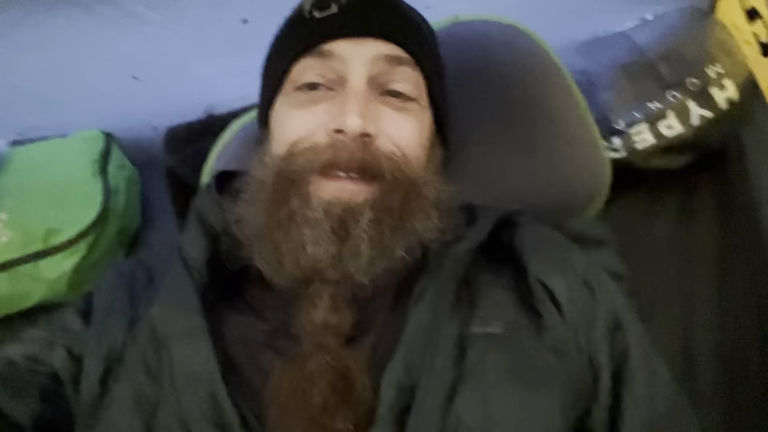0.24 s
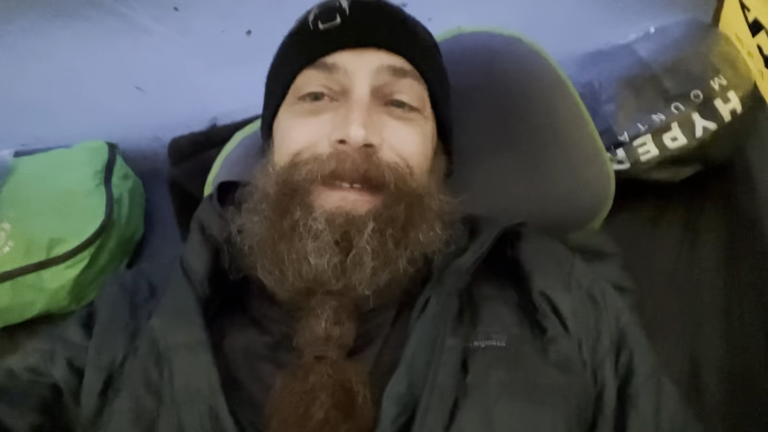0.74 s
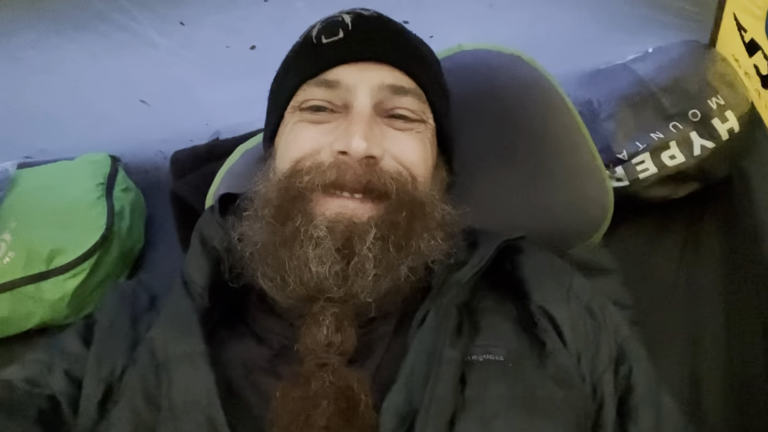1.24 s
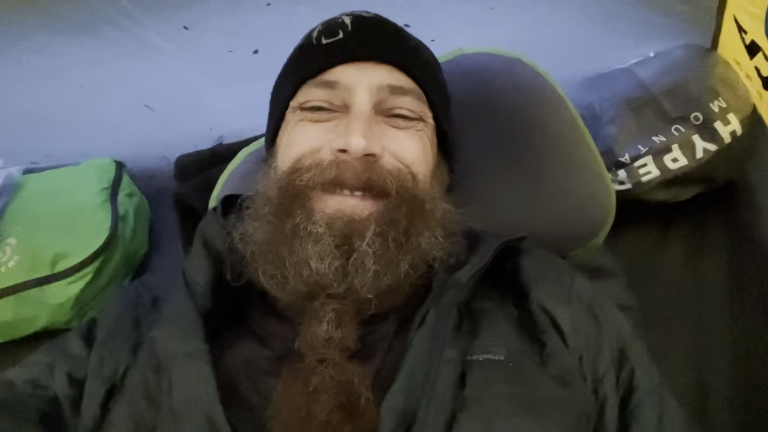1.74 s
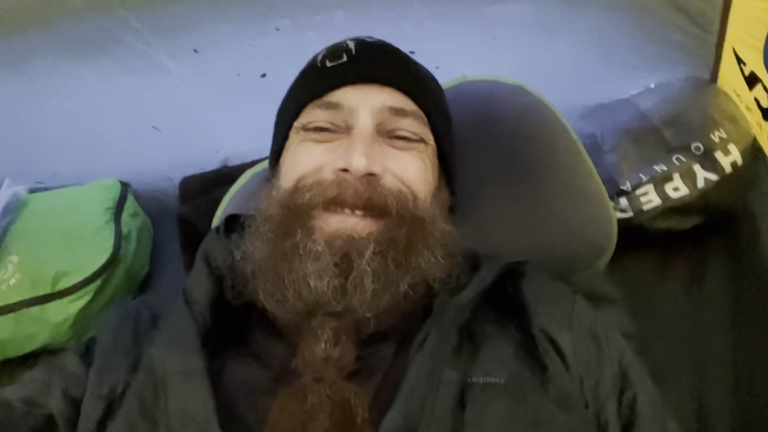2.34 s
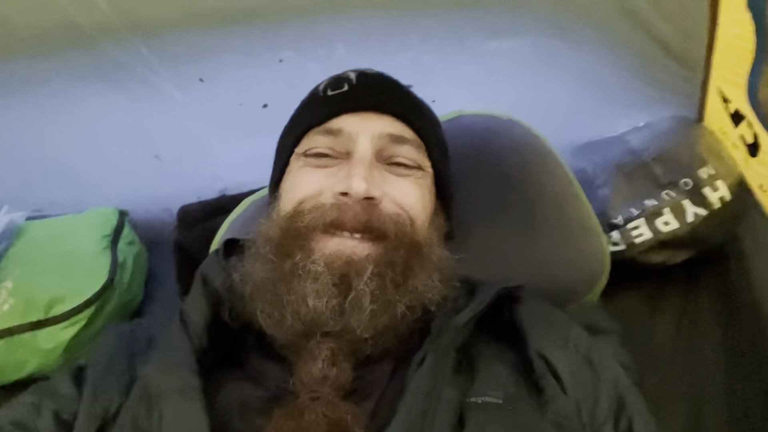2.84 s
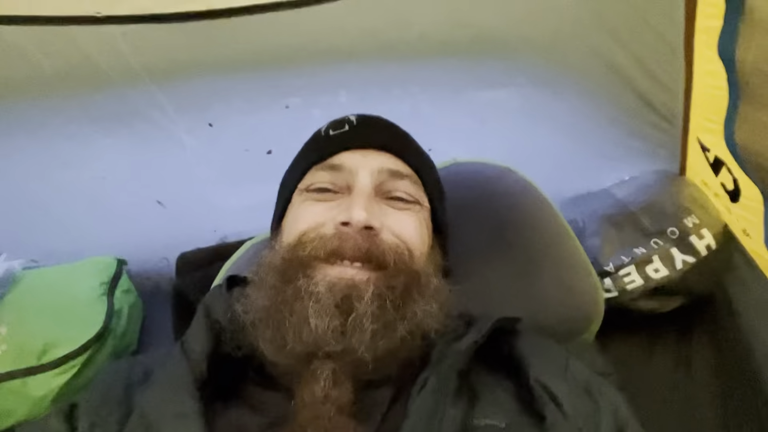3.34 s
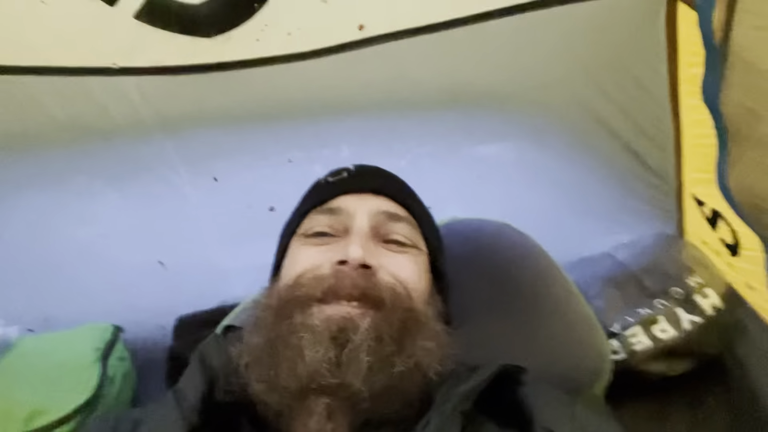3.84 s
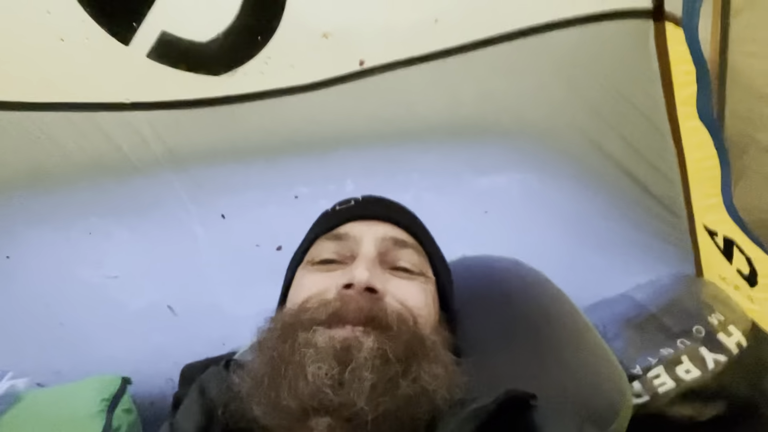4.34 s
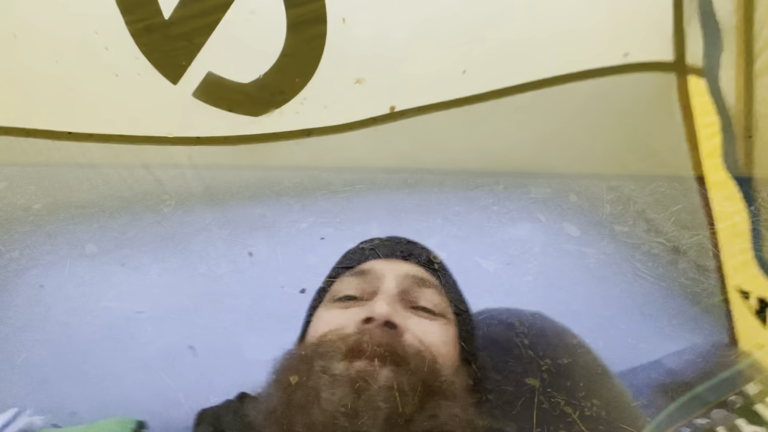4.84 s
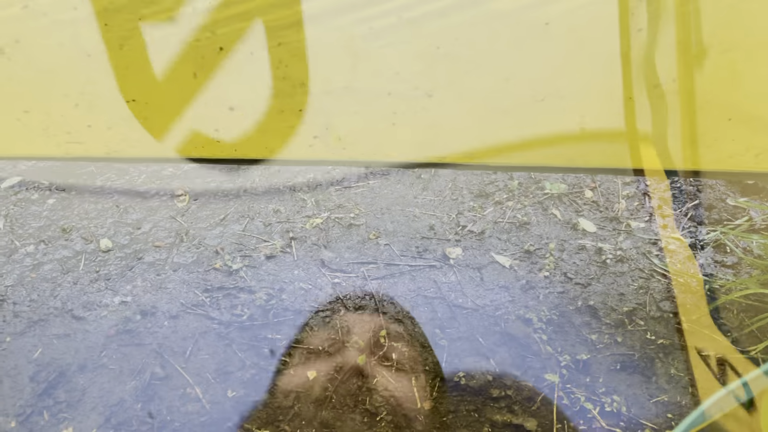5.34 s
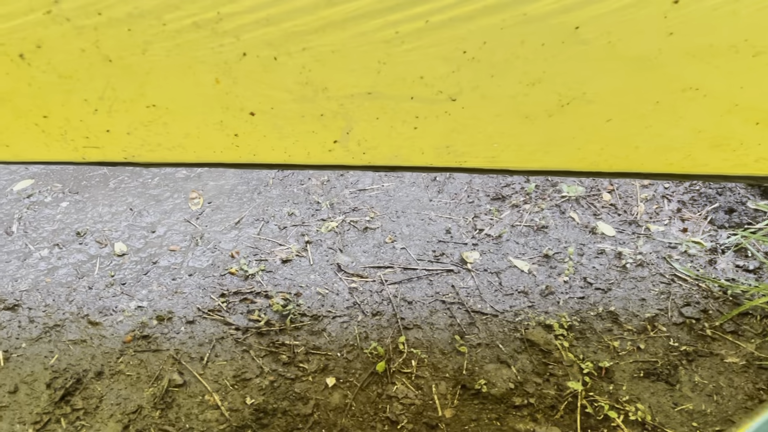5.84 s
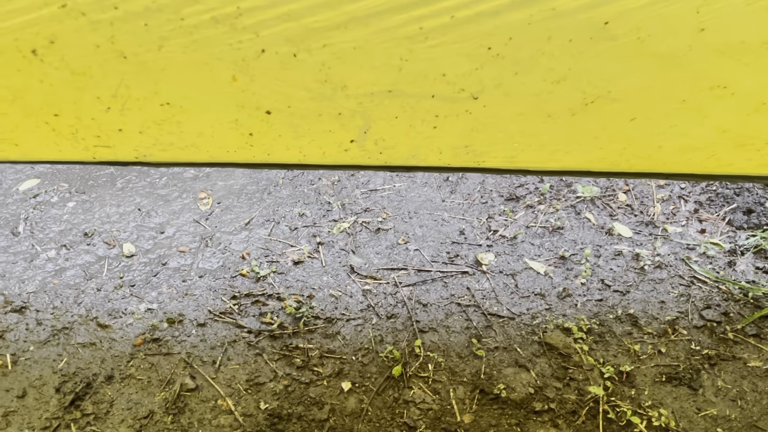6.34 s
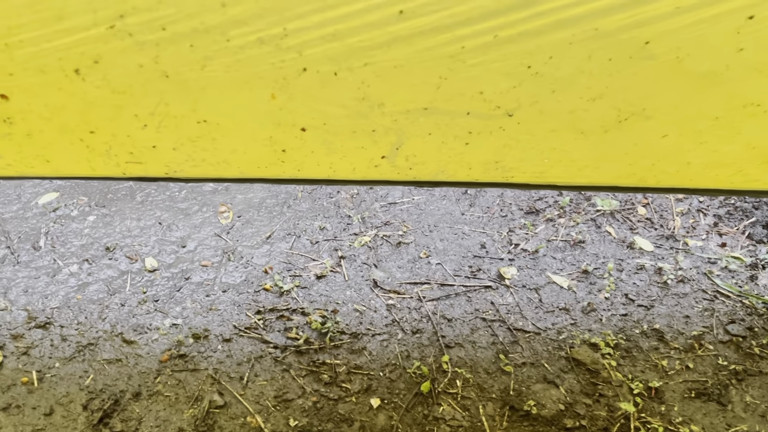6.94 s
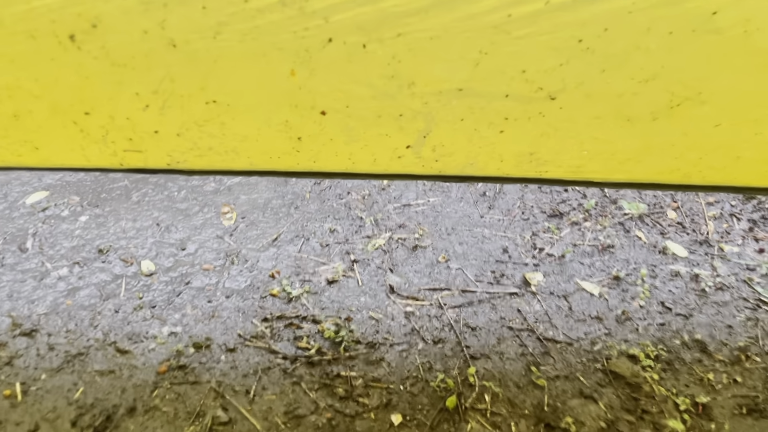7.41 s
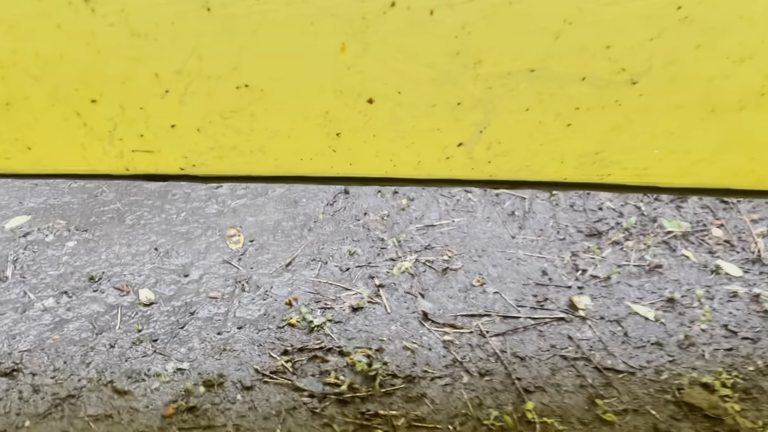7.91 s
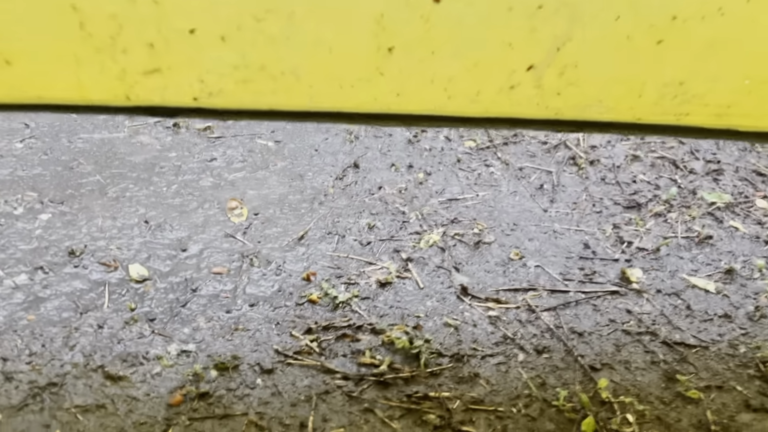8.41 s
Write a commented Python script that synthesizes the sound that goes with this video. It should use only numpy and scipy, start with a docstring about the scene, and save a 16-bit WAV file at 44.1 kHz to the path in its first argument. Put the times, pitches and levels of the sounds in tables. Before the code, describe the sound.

Fine rain patters on a tent roof over a smooth wash of more distant rain. Big drips plop irregularly close overhead, with dry pats and ticks between them and one brief rustle of fabric. Around the middle the patter eases for a moment, then the sound crossfades to the open doorway, where the rain is denser, fuller and slightly louder. Close stereo microphone, first inside the small tent, then at its door.

```python
"""Fine rain patters on the taut fabric of a tent, over a smooth wash of distant rain. From about 5 s the
sound fades from inside to the open door over wet ground; the patter lets up briefly just then.
Big drips plop on the roof: each blow spreads as a wave whose low notes travel slowest, a quick falling chirp.
Nearer drops pat, tick and spit; the fabric shudders, with a thin whistle and faint cheeps far underneath.
Fine drops are random blows ringing patches of fabric; the wash is filtered noise; the drips come from a list."""
import sys
import numpy as np
from scipy import signal
from scipy.fft import rfft, irfft, next_fast_len
from scipy.io import wavfile
from scipy.ndimage import uniform_filter1d

SR = 44100
rng = np.random.default_rng(int(sys.argv[2]) if len(sys.argv) > 2 else 0)


def waveform_to_disk(signal):
    """Save audio, clipped to [-1, 1], as 16-bit WAV at the path in sys.argv[1]."""
    frames = np.transpose(np.atleast_2d(signal))
    scaled = np.clip(frames, -1, 1) * 32767
    samples = np.round(scaled).astype(np.int16)
    wavfile.write(sys.argv[1], SR, samples)


N = 382347
SIZE = 4096  # samples in one short blow
HZ = np.fft.rfftfreq(SIZE, 1 / SR)
AGE = np.arange(SIZE) / SR
TIME = np.arange(N) / SR
LEAD_S = .002  # each blow starts this long after the start of its buffer
SIDE = np.array([[1], [-1]]) / 2  # half of a left-right difference goes to each ear
# how alike the sound is at the two ears: pitch_hz [Hz], coherence [-1 to 1]
SAME = [(60, 0.8), (280, 0.81), (650, 0.034), (1400, 0.011), (3100, 0.3), (7000, 0.013), (15000, 0.72)]


def rain(inside_db=2, outside_db=2.4, inside_ticks_db=-5, outside_ticks_db=-5.5,
         inside_wash_db=-.7, outside_wash_db=-1, wash_hiss_db=2, gust_db=1.3, gust_s=.07):
    """Patter over the smooth wash of distant rain; the open door lets in a denser, fuller sound."""
    # how far the door is open: start_s [s], share [0-1]
    door_table = [(0, 0), (5.02, 0), (5.7, 1), (8.67, 1)]
    # colour of the rain inside, then at the door: pitch_hz [Hz], level_db [dB, relative]
    inside_colour = [(20, -36), (40, -6), (70, -6), (160, -5.5), (400, -3.5), (680, -2), (1300, -4.5),
                     (2000, -5), (3000, -13), (4600, -13), (7600, -23.5), (11000, -20), (15500, -29.5)]
    outside_colour = [(20, -43), (40, -0.5), (80, 1.5), (150, -0.5), (280, -1.3), (500, 1.7), (1100, -0.8),
                      (2100, -2.5), (3200, -7), (6000, -11.8), (8300, -22), (10500, -19), (13500, -24.5),
                      (15500, -37)]
    # strength of the rain inside, then at the door, before the trims: start_s [s], level_db [dB]
    inside_strength = [(0.0, -48), (1.04, -51), (3.46, -49.5), (3.6, -51), (4.33, -50), (4.8, -50.5)]
    outside_strength = [(5.7, -46.5), (5.91, -46), (7.62, -46.5), (7.78, -47.5), (8.2, -45.5), (8.67, -46.5)]

    wash_colour = [(400, -0.38), (1300, -0.81), (4500, wash_hiss_db), (12000, -0.12)]  # (Hz, dB)
    wash = evened(coloured(rng.standard_normal((2, N)), wash_colour))

    # the patter lets up once, by 6 dB, and otherwise comes in short swells
    lull = swell(4.87, 0.31, rise_s=.07, fall_s=.07)
    gust_samples = max(round(gust_s * SR), 1)
    gusts = np.tanh(evened(uniform_filter1d(rng.standard_normal(N), gust_samples)))
    on_fabric = amp(-6 * lull) * amp(gust_db * gusts)

    inside = on_fabric * patter(550, 3.2) + amp(inside_wash_db) * wash
    inside = evened(coloured(paired(inside), inside_colour))
    inside = inside + amp(inside_ticks_db) * on_fabric * ticks(230, 3.2, top_db=-6)

    outside = on_fabric * patter(600, 3.1) + amp(outside_wash_db) * wash
    outside = evened(coloured(paired(outside), outside_colour))
    door_ticks = ticks(300, 2.8, high_hz=3600, crisp=.9, top_db=-2.5)
    outside = outside + amp(outside_ticks_db) * on_fabric * door_ticks

    door = np.clip(curve(door_table), 0, 1)
    inside_gain = amp(inside_db + curve(inside_strength)) * (1 - door)
    outside_gain = amp(outside_db + curve(outside_strength)) * door
    return inside_gain * inside + outside_gain * outside


def patter(per_s, spread_db, flurry_db=3.2, soft_hz=8000, ring_s=0.0023, low_hz=650, high_hz=3100,
           sharpness=4.9, tick_share=0.71, count=36):
    """Fine drops, many soft and few loud, swell in flurries; each rings a patch of fabric at its own pitch."""
    out = np.zeros((2, N))
    flurries = np.tanh(evened(uniform_filter1d(rng.standard_normal(N), size=550)))
    for patch_hz in np.geomspace(low_hz, high_hz, count):
        chance = rng.random(N)
        drop_size = np.minimum(rng.exponential(1, N), 2.6)
        strength = amp(spread_db * drop_size + flurry_db * flurries)
        hits = (chance < per_s / count / SR) * strength
        tick = splash(ring_s * rng.uniform(0.49, 1.9)) * chirp(rng.uniform(0, 1.975))
        tick = tick / np.sqrt(1 + (HZ / soft_hz) ** 2)  # the wet cloth cushions each blow
        tick = tick * (tick_share + ring(patch_hz, patch_hz / sharpness))
        tick = evened(irfft(tick)[:, :SIZE // 4])
        ear_gain = amp(rng.normal(0, 1.27, (2, 1)))
        out += signal.oaconvolve(hits[None], tick * ear_gain, axes=1)[:, :N]
    return evened(out)


def ticks(per_s, spread_db, top_db, low_hz=750, high_hz=2700, sharpness=1.3, crisp=.3,
          lag_s=.0005, pan_db=4, count=30):
    """Single drops on the near fabric: dry ticks of a cycle or two, each pitch from its own direction."""
    out = np.zeros((2, N))
    for patch_hz in np.geomspace(low_hz, high_hz, count):
        chance = rng.random(N)
        drop_size = np.minimum(rng.exponential(1, N), 2.5)
        hits = (chance < per_s / count / SR) * amp(spread_db * drop_size)
        side = SIDE * rng.uniform(-1, 1)
        # the nearer ear hears it louder and sooner
        ears = amp(side * pan_db) * np.exp(2j * np.pi * HZ * (side * lag_s - LEAD_S))
        tick = irfft(ears * ring(patch_hz, patch_hz / sharpness) * (1 + crisp * splash(.002)))
        tick = evened(tick[:, :SIZE // 8])
        out += signal.oaconvolve(hits[None], tick, axes=1)[:, :N]
    treble = [(2200, 0), (3200, top_db), (6000, top_db), (14000, top_db - 11)]  # (Hz, dB)
    return evened(coloured(out, treble))


def drips(big_db=-3.5, lesser_spread_db=7, count=22):
    """Big drips shared among four parts of the roof, and dull lesser ones far off on the first part."""
    # big drips: start_s [s], travel_ms [ms], thud_db, pat_db, snap_db [dB, before the trim big_db],
    # ring_hz of the struck panel [Hz], pan_db left over right [dB]; the heaviest also have
    # knock_hz of a second mode [Hz], seam_ms delay of the wave back from the nearest seam [ms],
    # seam_share of that wave [signed ratio]
    drip_table = [(0.0864, 0.54, -27, -21.5, -21, 1950, 3, 430, 4.07, -.39),
                  (0.206, 2.6, -37, -35, -52, 800, 3), (0.481, 2.3, -42, -42, -46, 980, 3.5),
                  (0.5465, 0.87, -31.6, -27.6, -42, 5400, 6.5, 3330, 5.35, .4),
                  (0.558, 2.4, -35, -38, -59, 450, 4), (0.8355, 0.81, -32, -35, -40, 2700, -3),
                  (0.9165, .5, -51, -44, -45, 900, 0),
                  (1.1375, 0.23, -28, -25, -26, 660, 7, 440, 1.16, -.48),
                  (1.3692, 2.7, -32, -39, -42, 2120, 3.5, 260, 2, .3),
                  (1.484, 0.43, -40, -50, -65, 300, -1), (1.544, 0.47, -33, -36.5, -37, 540, 4),
                  (1.69, 3.2, -34, -41, -40, 560, 8), (1.7056, 2.95, -37, -36.5, -39, 2860, 5),
                  (2.041, 1.3, -41, -40.5, -41.5, 1900, 3.5), (2.301, 1.05, -34.5, -38, -37, 2650, -1.5),
                  (2.403, 1.26, -50, -43, -46, 700, 6),
                  (2.4953, 1.3, -21, -29.5, -33, 250, 7.5, 5880, 2.06, .5),
                  (2.671, 2, -39, -35, -47, 2350, 5.5), (2.862, 0.36, -39, -38.5, -44, 2240, 7),
                  (2.951, 0.97, -50, -42.5, -42.5, 560, 3),
                  (3.102, 0.22, -16, -20, -21, 2970, 1.5, 570, .97, -.36),
                  (3.132, 1.4, -33, -45, -43, 3830, -1),
                  (3.221, 0.38, -38, -25.5, -30.5, 200, 2.5, 1540, 5.55, .7),
                  (3.298, 0.29, -49, -43.5, -43, 820, 5), (3.3088, 4.1, -25.5, -57, -34.5, 2180, 3),
                  (3.3425, 2.56, -36, -38, -35.5, 3440, 4), (3.4463, 0.47, -44, -37.5, -37, 800, -2),
                  (3.754, 4.7, -37.5, -45, -39, 4480, 6), (3.9, .28, -34, -37.5, -42, 3520, 1.5),
                  (4.949, 2.7, -39.5, -44.5, -59, 298, 4), (5.3343, 0.45, -34.5, -38, -40, 3400, 2.5),
                  (5.4091, 4.8, -34.5, -43, -37.5, 1740, 0), (5.497, 3, -50, -39, -52, 480, -2),
                  (5.7053, 4, -38, -56, -59, 250, 4), (6.0784, 0.35, -38, -33.5, -32, 2500, 4),
                  (6.3276, 0.59, -27.5, -26.3, -29, 1550, 3.5, 660, 2.27, -.26),
                  (6.468, 0.75, -49, -38, -43, 670, -4), (6.478, 2.2, -37, -41, -50, 300, 7),
                  (7.1214, 0.28, -29.5, -27.5, -28, 2120, 8, 650, 2.3, -.55),
                  (7.62, 2.2, -43, -38, -54, 450, -2), (7.878, 1.7, -32, -41.5, -45, 560, 4),
                  (8.156, 0.54, -32, -34, -49, 332, 7.5), (8.388, 1.27, -36, -48, -37, 1040, -2.5),
                  (8.4427, 0.9, -29.5, -36, -36.5, 1430, 0.5), (8.475, 1.3, -27.5, -46, -48, 250, -2),
                  (8.494, 1.3, -31, -50, -49, 250, 3)]
    parts = np.zeros((4, 2, N))
    for k, row in enumerate(drip_table):
        start_s, travel_ms, thud_db, pat_db, snap_db, ring_hz, pan_db, *knock_and_seam = row
        spray_db = -20.5 + 0.61 * snap_db  # the spray grows with the snap
        band_db = np.array([thud_db, pat_db, snap_db, spray_db]) + big_db
        sound = drip(travel_ms, band_db, ring_hz, pan_db, *knock_and_seam)
        add(parts[k % len(parts)], start_s - LEAD_S, sound)
    lesser_db = np.array([-57, -59, -64, -63])  # thud, pat, snap, spray of the smallest
    for when, far, drop_size, panel, place in rng.random((count, 5)):
        band_db = lesser_db + lesser_spread_db * drop_size
        sound = drip(1 + 5 * far, band_db, 400 + 700 * panel, 9 * (place - .5))
        add(parts[0], when * N / SR, sound)
    return parts


def drip(travel_ms, band_db, ring_hz, pan_db, knock_hz=0, seam_ms=0, seam_share=0,
         ring_gain=1.64, width_hz=220, knock_gain=1.3, knock_width=.25, spray_hz=2000,
         spray_s=0.0015, top_db=-9, lag_s=.00004):
    """One drip: a falling chirp below, a splash of spray above, coloured by the panel it hits."""
    # edges of the thud, pat, snap and spray bands: pitch_hz [Hz]
    band_edges_hz = [50, 250, 900, 3000, 15000]
    # the fabric radiates deep bass poorly: pitch_hz [Hz], level_db [dB, relative]
    radiation = [(20, -42), (45, -13), (70, -4.5), (110, -2), (170, 0), (260, 1), (400, 0)]

    edges = np.array(band_edges_hz)
    centres = np.sqrt(edges[1:] * edges[:-1])
    density_db = band_db - 10 * np.log10(np.diff(edges))  # band level spread over its width
    bands = [*zip(centres, density_db), (edges[-1], density_db[-1] + top_db)]
    colour = amp(read(bands, HZ)) * amp(read(radiation, HZ))
    # tight panels ring higher and more clearly
    panel_gain = ring_gain * np.sqrt(ring_hz / centres[2])
    colour = colour * (1 + panel_gain * ring(ring_hz, width_hz))
    if knock_hz:  # a heavy blow wakes a second mode
        colour = colour * (1 + knock_gain * ring(knock_hz, knock_width * knock_hz))

    wet = HZ ** 2 / (HZ ** 2 + spray_hz ** 2)  # share of spray, growing with pitch
    there_and_back = chirp(travel_ms) + seam_share * chirp(travel_ms + seam_ms)
    spray = splash(spray_s * (1 + 0.29 * abs(travel_ms)))
    wave = np.sqrt(1 - wet) * there_and_back + np.sqrt(wet) * spray
    # the nearer ear hears it louder and sooner: lag_s is seconds per dB
    ears = amp(SIDE * pan_db) * np.exp(2j * np.pi * HZ * SIDE * pan_db * lag_s)
    # band levels stand for mean power over 10 ms
    return irfft(colour * wave * ears) * SR * np.sqrt(.01 / 2)


def chirp(travel_ms, cycles=1.096, knee_hz=25, reference_hz=300):
    """A wave on air-loaded fabric, whose speed grows as the cube root of frequency, as a turn of phase."""
    hz = HZ + knee_hz
    travel_s = max(travel_ms, 0) / 1000
    delay_s = cycles / hz + travel_s * np.cbrt(reference_hz / hz)
    return np.exp(-2j * np.pi * (np.cumsum(delay_s) * HZ[1] + LEAD_S * HZ))


def splash(decay_s, rise_s=0.00047):
    """Spectrum, of mean power 1, of a short noise burst of spray at each ear."""
    age = np.maximum(AGE - LEAD_S, 0)
    envelope = (1 - np.exp(-age / rise_s)) * np.exp(-age / decay_s)
    burst = rng.standard_normal((2, SIZE)) * envelope
    return rfft(burst / np.linalg.norm(burst, axis=1, keepdims=True))


def tent(x):
    """Waves come back from poles and seams; the slack fabric sways longest in the bass."""
    # time for the ring of the tent to fall by 60 dB: pitch_hz [Hz], t60_s [s]
    t60_table = [(60, .13), (150, .05), (400, .035), (1500, .04), (5000, .03), (14000, .03)]
    # strength of that ring: pitch_hz [Hz], level_db [dB, relative]
    ring_strength = [(60, -4), (150, 1), (400, -7.5), (1500, -5), (5000, 3.5), (14000, -1)]
    # sparse random echoes, none sooner than 3 ms
    length = SIZE * 2
    taps = rng.standard_normal((2, length)) * (rng.random((2, length)) < .15)
    taps *= np.arange(length) / SR > .003
    hz, t, z = signal.stft(taps, SR, nperseg=256)
    same = np.clip(read(SAME, hz), -1, 1)[:, None]
    z[1] = same * z[0] + np.sqrt(1 - same ** 2) * z[1]
    # each pitch dies away at its own rate
    decay_s = read(t60_table, hz)[:, None] / np.log(1000)
    strength = amp(read(ring_strength, hz)[:, None])
    z *= strength * np.exp(-t / decay_s) / np.sqrt(decay_s * SR / 2)
    tail = signal.istft(z, SR, nperseg=256)[1] / taps.std()
    return x + signal.fftconvolve(x, tail, axes=1)[:, :N]


def pats(pat_db=-1.2, sharpness=1.1, scatter=1.6, scatter_s=.003, soft_hz=4000):
    """Middling drops close by: a dry pat of one fabric patch, and the droplets it scatters."""
    # start_s [s], level_db [dB, before the trim pat_db], pitch_hz of the patch [Hz],
    # pan_db left over right [dB]
    pat_table = [(0.0512, -42.9, 1290.0, 6), (0.0675, -42.2, 1350.0, 5), (0.1558, -42.6, 1200.0, 5),
                 (0.2298, -41.6, 1600.0, 3), (0.3477, -43.0, 940.0, 6), (0.7771, -44.4, 1340.0, 2),
                 (0.8767, -43.9, 1120.0, -1), (0.9895, -43.4, 1600.0, 1), (1.0097, -44.8, 1290.0, 4),
                 (1.216, -41.2, 1310.0, 1), (1.9351, -40.1, 1090.0, 4), (1.9892, -42.7, 1220.0, -2),
                 (2.0218, -43.0, 1260.0, -1), (2.4465, -44.0, 1560.0, 2), (2.5308, -41.3, 1030.0, 4),
                 (2.601, -43.1, 1200.0, 3), (2.7615, -37.8, 940.0, -5), (3.2011, -43.3, 1280.0, 6),
                 (3.5065, -44.5, 1390.0, 0), (3.5344, -43.6, 1560.0, 1), (4.2033, -44.2, 1260.0, 1),
                 (4.4109, -44.2, 1500.0, -4), (4.5639, -44.5, 1280.0, -2), (4.7776, -44.7, 930.0, -3),
                 (4.8072, -45.4, 1470.0, 0), (4.8426, -40.7, 1360.0, -5), (4.8981, -44.4, 1600.0, -1),
                 (4.9491, -46.3, 1040.0, -1), (5.1913, -45.9, 1680.0, 0), (5.2634, -45.7, 1320.0, -4),
                 (5.2798, -43.6, 1770.0, 2), (5.3023, -44.3, 1370.0, -1), (5.7365, -40.5, 1240.0, 1),
                 (5.7561, -39.5, 1830.0, 0), (6.1335, -39.5, 1610.0, 2), (6.6072, -39.1, 1250.0, -3),
                 (6.705, -39.5, 1360.0, 0), (6.8064, -40.2, 1250.0, 1), (6.8297, -40.0, 1340.0, -3),
                 (7.0217, -39.2, 1700.0, -1), (7.1005, -39.5, 1660.0, 1), (7.3638, -39.1, 1260.0, -4),
                 (7.4627, -38.7, 1280.0, -3), (7.6223, -39.6, 970.0, -2), (7.917, -40.5, 1310.0, 2),
                 (8.2929, -39.8, 1520.0, 0), (8.3633, -38.6, 1070.0, 2), (8.4779, -40.4, 1280.0, 0),
                 (8.5235, -40.5, 1310.0, 3), (8.6048, -39.4, 1270.0, 1)]
    out = np.zeros((2, N))
    for start_s, level_db, pitch_hz, pan_db in pat_table:
        blow = np.exp(-2j * np.pi * HZ * LEAD_S) + scatter * splash(scatter_s)
        blow = blow * ring(pitch_hz, pitch_hz / sharpness)
        blow = blow / np.sqrt(1 + (HZ / soft_hz) ** 2)  # softens the treble
        add(out, start_s - LEAD_S, tap(blow, level_db + pat_db, pan_db))
    return out


def spits(decay_s=.0025, sharpness=.9, soft_hz=12000):
    """Drops that burst close by: a short noise burst of bright spray with no thud."""
    # start_s [s], level_db [dB], pitch_hz of the centre [Hz], pan_db left over right [dB]
    spit_table = [(1.544, -46, 6000, 5), (1.937, -53, 4000, 0), (2.403, -41, 5000, 5),
                  (6.11, -39.5, 7000, 0), (7.392, -45, 5000, 1), (8.54, -45, 7000, 0)]
    out = np.zeros((2, N))
    for start_s, level_db, pitch_hz, pan_db in spit_table:
        spray = splash(decay_s) * ring(pitch_hz, pitch_hz / sharpness)
        spray = spray / np.sqrt(1 + (HZ / soft_hz) ** 2)
        add(out, start_s - LEAD_S, tap(spray, level_db, pan_db))
    return out


def tap(spectrum, db, pan_db):
    """A short stereo blow from its spectrum; the level is its mean power over 5 ms."""
    blow = irfft(spectrum * amp(SIDE * pan_db))
    energy = np.mean(np.sum(blow ** 2, axis=1))
    return amp(db) * blow * np.sqrt(.005 * SR / energy)


def shudder(slips_per_s=85, unevenness=.6, sway_hz=68, wander=0.094):
    """Fabric slips in quick uneven jerks, each a soft thump, while a slack panel sways."""
    # start_s [s], length_s [s], jerks_db [dB], sway_db [dB]; levels before a 1 dB lean to the left
    shudder_table = [(1.215, .115, -42.5, -51), (1.341, .019, -42, -46), (1.557, .046, -40, -44),
                     (1.61, .08, -50, -43.5), (1.70, .062, -45, -42)]
    # colour of one thump: pitch_hz [Hz], level_db [dB, relative]
    thump_colour = [(40, -27), (85, 2), (150, -4.5), (300, -0.5), (450, -19), (1200, -59)]
    drift, sag = evened(uniform_filter1d(rng.standard_normal((2, N)), size=500))
    slip_rate = slips_per_s * np.exp(unevenness * drift)
    slips = np.diff(np.floor(np.cumsum(slip_rate) / SR), prepend=0)  # one click per slip
    jerks = evened(coloured(slips - slips.mean(), thump_colour))
    sway = evened(np.sin(2 * np.pi * np.cumsum(sway_hz * np.exp(wander * sag)) / SR))
    out = np.zeros(N)
    for start_s, length_s, jerks_db, sway_db in shudder_table:
        # the sway builds up during the jerks, then dies away
        build = np.clip((TIME - start_s) / .025, 0, 1)
        swaying = build * np.exp(-np.maximum(TIME - start_s - length_s, 0) / .018)
        jerking = swell(start_s, length_s, rise_s=.008, fall_s=.008)
        out += amp(jerks_db) * jerking * jerks + amp(sway_db) * swaying * sway
    return out * amp([[1], [-1]])  # left 1 dB up, right 1 dB down


def whistle(lowest_hz=5000, lowest_s=1.6, bend_hz_per_s2=2200, edge_s=.012):
    """A thin, fluttering tone far under the rain, in short pulses; its pitch sags and comes up again."""
    # start_s [s], length_s [s], level_db [dB]
    whistle_table = [(1.42, .045, -69), (1.48, .045, -66), (1.565, .026, -63), (1.605, .04, -61),
                     (1.662, .025, -64), (1.725, .045, -64)]
    hz = lowest_hz + bend_hz_per_s2 * (TIME - lowest_s) ** 2
    level = np.zeros(N)
    for start_s, length_s, level_db in whistle_table:
        level += amp(level_db) * swell(start_s, length_s, edge_s, edge_s)
    return blurred(hz, clean=1.8, smear_s=.015) * level


def cheeps():
    """Faint cheeps, probably a bird far off: blurred tones that glide from one pitch to another."""
    # start_s [s], length_s [s], from_hz [Hz], to_hz [Hz], level_db [dB]
    cheep_table = [(.26, .045, 3150, 2850, -60), (.34, .035, 2850, 3700, -61),
                   (.365, .028, 3780, 3820, -61), (2.12, .1, 3600, 4400, -66), (2.2, .09, 4450, 4470, -66),
                   (2.33, .04, 3450, 3500, -60), (4.6, .06, 4620, 4570, -66), (4.92, .03, 4550, 4550, -65),
                   (5.22, .04, 4500, 4520, -65)]
    out = np.zeros((2, N))
    for start_s, length_s, from_hz, to_hz, level_db in cheep_table:
        along = np.linspace(0, 1, max(round(length_s * SR), 2))
        envelope = np.sqrt(np.sin(np.pi * along).clip(0))
        tone = blurred(from_hz + (to_hz - from_hz) * along)
        add(out, start_s, amp(level_db) * envelope * tone)
    return out


def blurred(hz, clean=.9, smear_s=.012):
    """A far tone of rms 1 overall: it reaches each ear by many paths, so it flutters."""
    smear_samples = max(round(smear_s * SR), 1)
    paths = uniform_filter1d(rng.standard_normal((2, 2, len(hz))), smear_samples)
    carrier = np.exp(2j * np.pi * np.cumsum(hz) / SR)
    return evened((carrier * (clean + evened(paths[0]) + 1j * evened(paths[1]))).real)


def ring(hz, width_hz):
    """A damped resonance of gain 1 at its peak."""
    return 1j * HZ * width_hz / (hz ** 2 - HZ ** 2 + 1j * HZ * width_hz)


def swell(start_s, length_s, rise_s, fall_s):
    """An envelope that rises, holds until length_s is over, and falls."""
    age = TIME - start_s
    return np.clip(age / rise_s, 0, 1) * np.clip(1 - (age - length_s) / fall_s, 0, 1)


def paired(x):
    """Two unrelated signals become two ears, as alike at each pitch as SAME says."""
    size = next_fast_len(N + SIZE)
    a, b = rfft(x, size)
    same = np.clip(read(SAME, np.fft.rfftfreq(size, 1 / SR)), -1, 1)
    mid = a * np.sqrt((1 + same) / 2)
    side = b * np.sqrt((1 - same) / 2)
    return irfft(np.array([mid + side, mid - side]), size)[:, :N]


def coloured(x, points):
    """Filters a sound by a table of (Hz, dB)."""
    size = next_fast_len(N + SIZE)
    gain = amp(read(points, np.fft.rfftfreq(size, 1 / SR)))
    return irfft(rfft(x, size) * gain, size)[..., :N]


def read(points, hz):
    """Reads a pitch table at any frequency, on a log-frequency axis."""
    f, value = np.transpose(points)
    return np.interp(np.log(hz + 1), np.log(f + 1), value)


def curve(rows, column=1):
    """One column of a time table at every sample."""
    rows = np.asarray(rows)
    return np.interp(TIME, rows[:, 0], rows[:, column])


def add(mix, s, sound):
    """Mixes a stereo sound in at time s."""
    part = mix[:, max(round(s * SR), 0):][:, :sound.shape[1]]
    part += sound[:, :part.shape[1]]


def amp(db):
    """Decibels to gain."""
    return 10 ** (np.asarray(db) / 20)


def evened(x):
    """Scales to rms 1."""
    return x / np.sqrt(np.mean(x ** 2) + 1e-20)


def scene():
    """The steady rain, drips on four parts of the roof with their own rings, and the smaller sounds."""
    roof = sum(tent(part) for part in drips())
    return rain() + roof + pats() + spits() + shudder() + whistle() + cheeps()


def record(dry):
    """Limits the band: a steep low-pass filter removes what lies above about 15.5 kHz."""
    low_pass = signal.firwin(511, 15500, window=("kaiser", 9), fs=SR)
    return signal.oaconvolve(dry, low_pass[None], "same", axes=1)


dry = scene()
out = record(dry)
waveform_to_disk(out)
```